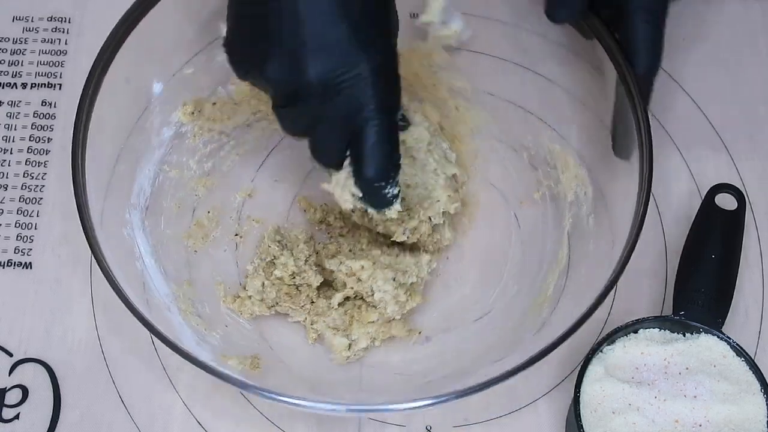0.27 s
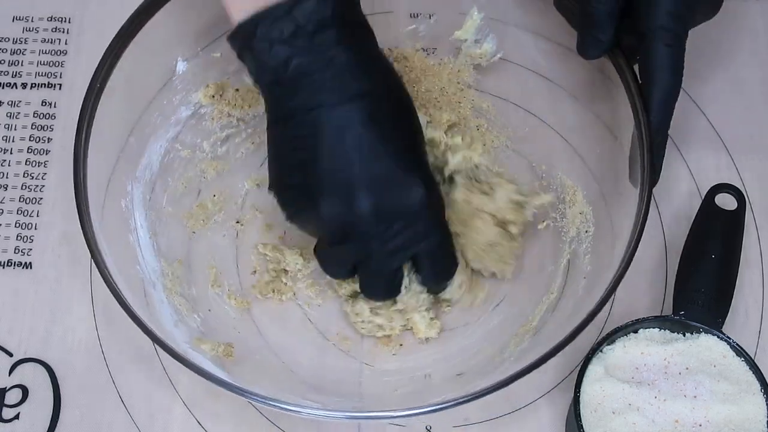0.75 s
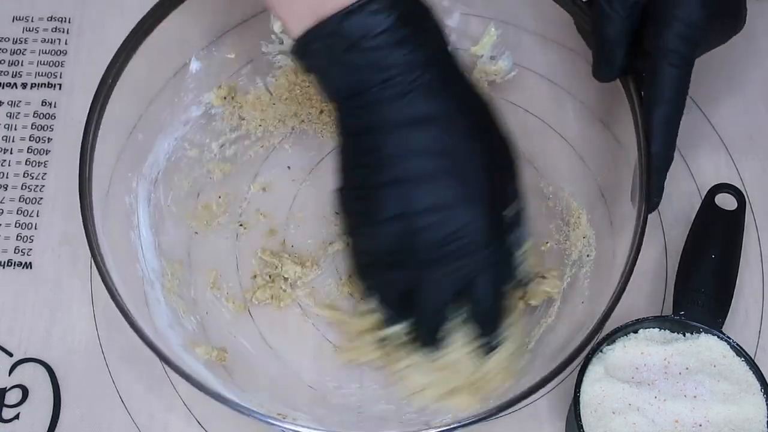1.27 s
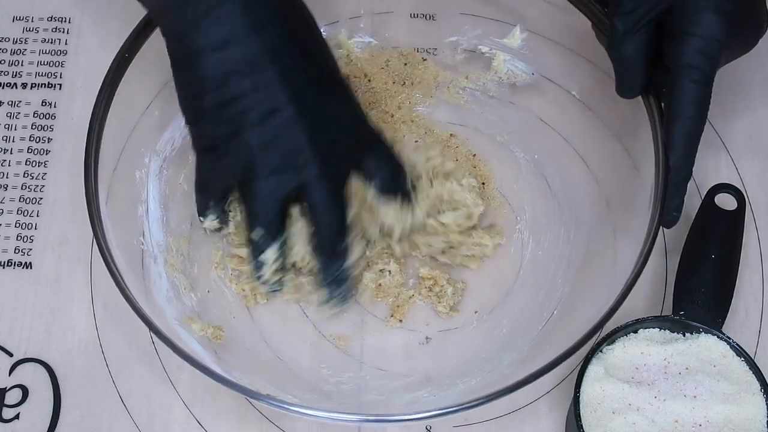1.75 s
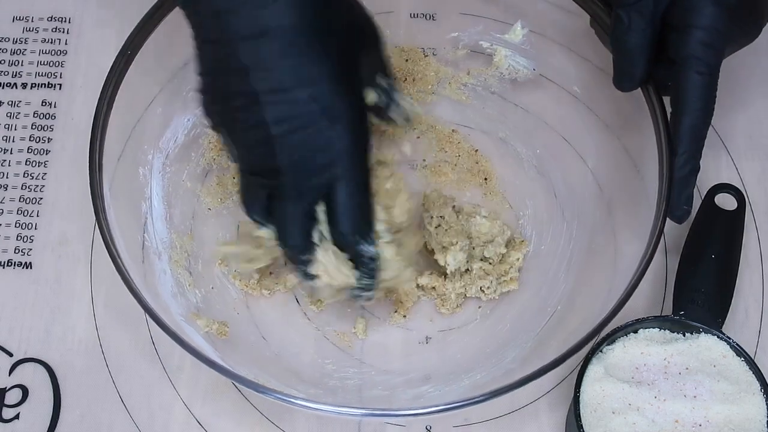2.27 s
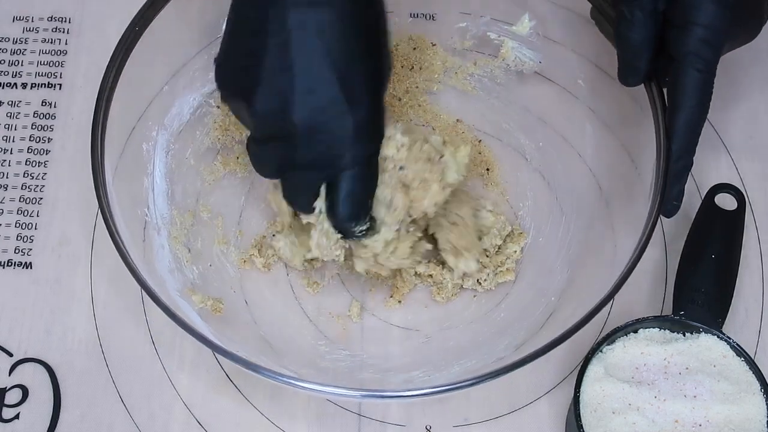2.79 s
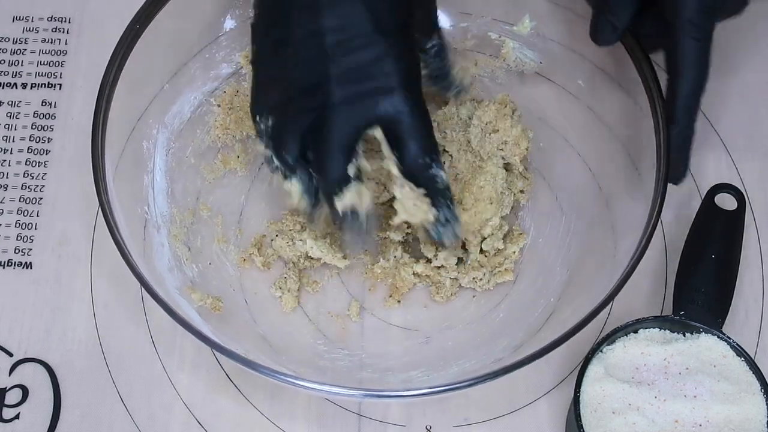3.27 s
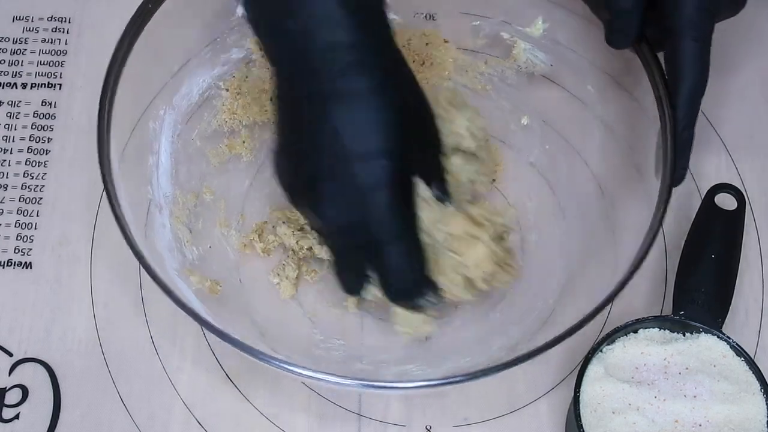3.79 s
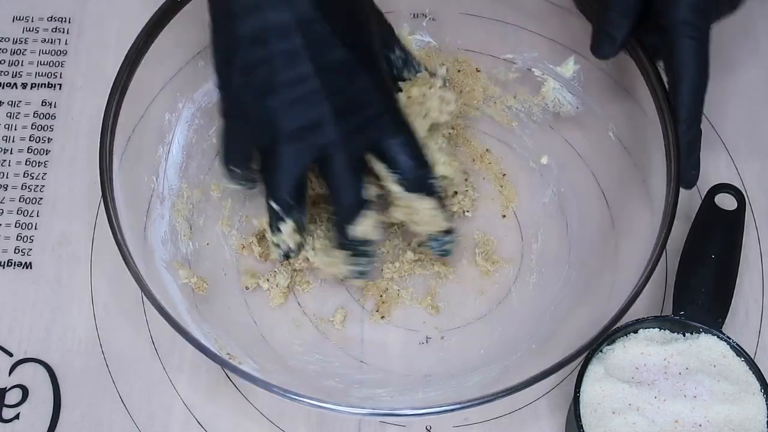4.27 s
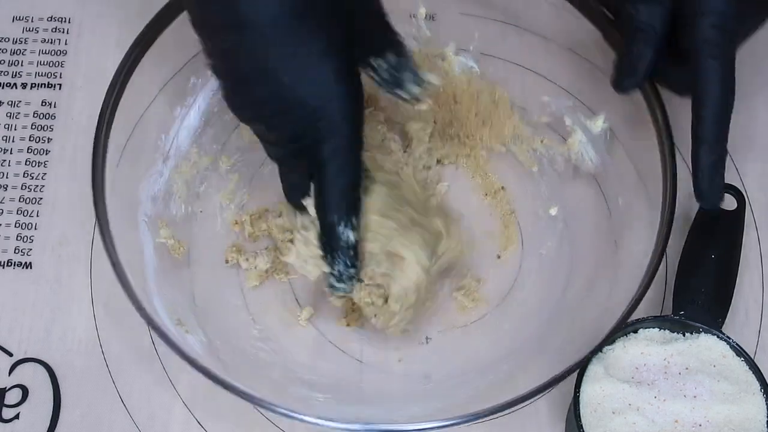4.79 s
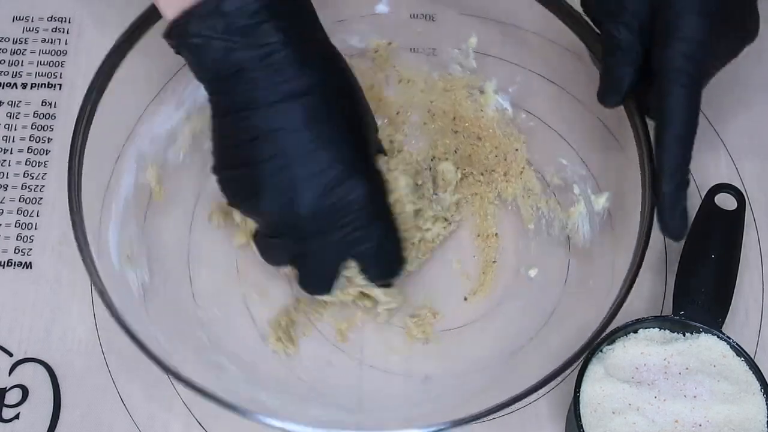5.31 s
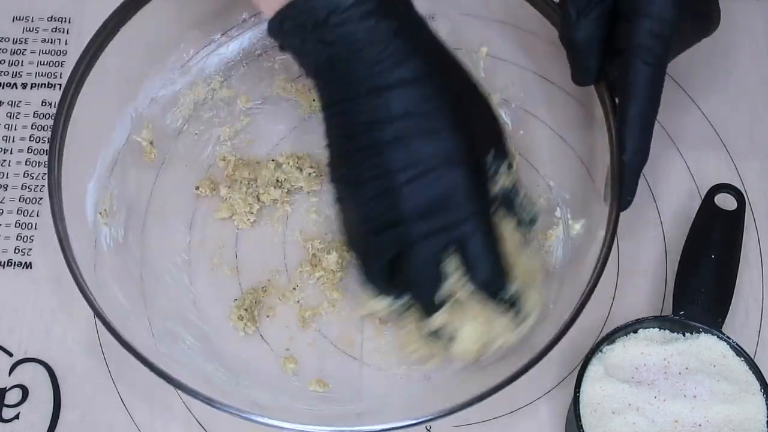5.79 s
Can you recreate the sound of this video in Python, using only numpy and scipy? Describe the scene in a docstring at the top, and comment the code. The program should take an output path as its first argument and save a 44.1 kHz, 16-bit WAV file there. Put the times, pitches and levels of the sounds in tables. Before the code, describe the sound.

Close stereo pickup of gloved hands kneading crumbly dough in a glass bowl. Soft gritty sliding, thin rubbery crinkles and tiny sticky snaps run throughout, with low dull worktop hums under the pushes. A solid bowl knock comes at one second, smaller ones in the middle, a cluster near 4.8 and the loudest blow at 5.5. Quiet kitchen hiss underneath.

```python
"""Dough slides and crumbles on a glass bowl (grainy noise through glass resonances) while gloves crinkle.
Every push of the kneading hands sets a light worktop humming low (decaying modes); sharp snaps click.
Now and then the tilted bowl drops back with a knock (bowl and board modes) that the kitchen answers.
A quiet hiss of room and camera lies under it all."""
import sys
import numpy as np
from scipy import signal
from scipy.fft import rfft, irfft, next_fast_len
from scipy.io import wavfile
from scipy.ndimage import map_coordinates

SR = 44100
rng = np.random.default_rng(int(sys.argv[2]) if len(sys.argv) > 2 else 0)


def store_pcm(level_fs):
    """Save levels as 16-bit WAV."""
    pcm = np.round(np.clip(level_fs, -1, 1) * 32767).astype(np.int16)
    wavfile.write(sys.argv[1], SR, np.atleast_2d(pcm).T)


N = 266805

# left-right likeness of lump and hiss: hz, correlation
LIKENESS = [(60, 1), (180, 0.41), (550, 0.25), (1650, 0.58), (4970, 0.15), (15000, 0.083)]


def amp(db):
    """Gain of a level in dB."""
    return np.exp(np.asarray(db) * (np.log(10) / 20))


def unit(x):
    """Scaled to rms 1."""
    return x / np.sqrt(np.mean(x ** 2) + 1e-20)


def along(points, hz):
    """Interpolates (Hz, value) points on a log-frequency axis."""
    point_hz, value = np.transpose(points)
    return np.interp(np.log(hz + 1), np.log(point_hz + 1), value)


def wobble(knots_per_s):
    """A smooth random curve through normally distributed knots."""
    knots = rng.standard_normal(int(N * knots_per_s / SR) + 4)
    return map_coordinates(knots, [np.arange(N) * knots_per_s / SR])


def filtered(x, response):
    """x times a complex response of frequency."""
    size = next_fast_len(x.shape[-1] + 8192)
    spectrum = rfft(x, size) * response(np.fft.rfftfreq(size, 1 / SR))
    return irfft(spectrum, size)[..., :x.shape[-1]]


def peak(f, hz, width_hz):
    """Response of one resonance."""
    return 1j * f * width_hz / (hz * hz - f * f + 1j * f * width_hz)


def grit(per_s, spread_db, share):
    """Two unrelated noise streams with sparse grains of uneven size mixed in by power share."""
    hits = rng.random((2, N)) < per_s / SR
    signs = np.sign(rng.standard_normal((2, N)))
    grains = hits * signs * amp(spread_db * rng.random((2, N)))
    share = np.clip(share, 0, 1)
    return np.sqrt(1 - share) * rng.standard_normal((2, N)) + np.sqrt(share) * unit(grains)


def spread(pair, colour, likeness):
    """Colours two streams and mixes them to left and right of the given likeness; rms 1."""
    def mid_side(hz):
        turn = np.arccos(np.clip(along(likeness, hz), -1, 1)) / 2
        return colour(hz) * [np.cos(turn), np.sin(turn)]

    mid, side = filtered(pair, mid_side)
    return unit(np.array([mid + side, mid - side]))


def add(track, s, sound):
    """Mixes a sound in at s seconds."""
    part = track[..., round(s * SR):][..., :sound.shape[-1]]
    part += sound[..., :part.shape[-1]]


def swells(rows, rise_db, fall_db_per_s, hold_s=0):
    """Gain of each movement every 64 samples: builds up to its peak, holds, then lets go."""
    peak_s, build_s, level_db = np.transpose(rows)[:3, :, None]
    after_s = np.arange(0, N, 64) / SR - peak_s
    rise = rise_db * after_s / np.maximum(build_s, .01)
    fall = -fall_db_per_s * np.maximum(after_s - hold_s, 0)
    return amp(level_db + np.where(after_s < 0, rise, fall))


def summed(gains):
    """Movements add up in power; one gain per sample."""
    total = np.sqrt(np.sum(gains ** 2, axis=0) + 1e-12)
    return np.interp(np.arange(N), np.arange(0, N, 64), total)


def dough():
    """Crumbs drag on the glass, duller when smeared and brighter when torn; the lump shifts its weight."""
    # strokes round the bowl: peak_s, build_up_s, sliding_db, hold_s, tearing (0-1)
    stroke_rows = [(0, .2, -48, 0.0055, .5), (0.175, 0.049, -52, 0.011, .55), (.42, 0.26, -60.5, 0, 0.7),
                   (.74, 0.33, -53, 0.077, .25), (0.977, 0.6, -55.5, 0.069, 0.28),
                   (1.34, .3, -52, 0.2, 0.54), (1.566, 0.18, -40, 0.15, 0.21), (1.9, 0.36, -55, 0.18, .35),
                   (2.155, 0.11, -51, 0, 0.25), (2.3, .08, -48.5, 0, 0.74), (2.347, 0.0084, -45, 0, .95),
                   (2.45, 0.15, -56, 0.23, 0.34), (2.72, 0.29, -55.5, 0.08, 0.56),
                   (2.871, 0.019, -49, 0.053, 0.78), (3.28, 0.067, -64, 0.024, 0.5),
                   (3.614, 0.25, -53.5, .04, 0.32), (3.795, 0.091, -48.5, 0, 0.26),
                   (3.92, 0.018, -48.5, 0.058, 0.45), (4.17, .12, -57, 0, 0.74),
                   (4.427, 0.44, -53.5, 0.096, .2), (4.62, 0.17, -48, 0.041, 0.16),
                   (5.162, 0.11, -58, 0.13, .37), (5.421, .15, -49.5, .02, 0.19),
                   (5.52, 0.12, -51.5, 0, 0.8), (5.887, 0.065, -55.5, 0.1, 0.37),
                   (6.05, 0.12, -49, 0, 0.31)]
    # dough-on-glass resonances: hz, width_hz, smeared_db, torn_db
    glass_peaks = [(1705, 430, 4, -1), (2267, 290, 4, 10.5), (2820, 680, -12.5, 14), (3490, 1380, -10, 3),
                   (4800, 1400, -14, -26)]
    # lump colour: hz, relative_db_per_hz
    lump_colour = [(71, -36), (120, -7), (285, -13.5), (349, -8), (392, -10.5), (1500, -21), (1950, -58),
                   (3300, -120)]
    lump_db, lump_db_per_sliding_db = -54, 0.36  # lump_db holds at sliding -55 dB

    def glass(column):
        def colour(f):
            # neighbouring resonances alternate in sign
            total = sum((-1) ** k * amp(row[column]) * peak(f, *row[:2]) for k, row in enumerate(glass_peaks))
            return total * f * f / (f * f + 1200 ** 2)
        return colour

    def drag(column):
        return spread(grit(per_s=980, spread_db=17, share=0.34), glass(column), [(1000, 1.0), (6000, 0.99)])

    hold_s, tearing = np.clip(np.transpose(stroke_rows)[3:, :, None], 0, 1)
    strokes = swells(stroke_rows, rise_db=18, fall_db_per_s=146, hold_s=hold_s)
    smeared, torn = drag(2), drag(3)
    slide = summed(strokes * np.sqrt(1 - tearing)) * smeared + summed(strokes * np.sqrt(tearing)) * torn
    lump = spread(grit(per_s=200, spread_db=28, share=0.41), lambda f: amp(along(lump_colour, f)), LIKENESS)
    lump_gain = (summed(strokes) / amp(-55)) ** lump_db_per_sliding_db
    return amp(1.06 * wobble(60)) * slide + amp(lump_db + 1.27 * wobble(9.3)) * lump_gain * lump


def gloves():
    """Flexing fingers crinkle the thin rubber: noise with tiny grains, its level wavering fast."""
    # finger flexes: peak_s, build_up_s, crinkle_db
    flex_rows = [(0, .2, -50), (.17, 0.062, -59.5), (.4, 0.41, -60), (.71, 0.27, -58.5), (.78, .06, -57.5),
                 (1.0, 0.31, -57.5), (1.2, .04, -59), (1.55, 0.66, -60), (1.69, .3, -59), (1.99, 0.57, -65),
                 (2.15, 0.8, -58), (2.26, 0.027, -52.5), (2.4, 0.33, -56), (2.78, 0.48, -57),
                 (2.92, 0.24, -51.5), (3.2, 0.55, -61), (3.5, 0.07, -70), (3.64, 0.12, -55.5),
                 (3.74, .05, -59), (3.93, 0.17, -62), (4.15, 1, -56), (4.44, 0.042, -57),
                 (4.65, 0.36, -54.5), (4.76, .15, -51.5), (4.84, 0.14, -53), (4.92, .05, -59),
                 (5.29, 0.3, -57.5), (5.38, 0.12, -56), (5.44, 0.051, -51.5), (5.52, 0.25, -52.5),
                 (5.61, .02, -63), (6.05, 0.14, -56.5)]
    # crinkle colour: hz, relative_db_per_hz
    crinkle_colour = [(2940, -20), (5000, -8.5), (7790, -18), (8710, -16), (10500, -17), (12900, -13.5),
                      (14600, -18.5), (16000, -49)]
    grains = grit(per_s=700, spread_db=1, share=0.44)
    crinkle = spread(grains, lambda f: amp(along(crinkle_colour, f)), [(4000, 0.19), (15000, 0.053)])
    flexes = summed(swells(flex_rows, rise_db=17, fall_db_per_s=181))
    return flexes * amp(2.3 * wobble(40)) * crinkle


def room_hiss():
    """Steady noise of room and camera, strongest in the bass."""
    # hiss colour: hz, relative_db_per_hz
    hiss_colour = [(15, -32), (25, 6), (76, 3.5), (200, -7), (256, -3.5), (575, -16), (887, -11.5),
                   (1370, -18), (2220, -16), (7510, -32), (13200, -45), (14800, -52), (16000, -60)]
    level_db = -50
    noise = rng.standard_normal((2, N))
    return amp(level_db) * spread(noise, lambda f: amp(along(hiss_colour, f)), LIKENESS)


def worktop():
    """A hand's slow push rings the modes of the worktop on its legs, most those near its favoured pitch."""
    # hand leaning on the worktop: push_s, level_db, favoured_hz
    pushes = [(0.018, -36, 120), (0.253, -32, 103.5), (0.431, -32, 114.2), (0.871, -35.5, 182.4),
              (1.089, -38, 69), (1.203, -37.5, 150), (1.602, -38, 73.4), (2.029, -44, 53),
              (2.269, -37.5, 67.9), (2.399, -29.5, 105), (2.523, -36.5, 119.4), (2.696, -32.5, 66),
              (2.817, -29.5, 101.3), (3.073, -28.5, 92), (3.255, -36, 50.2), (3.516, -36, 69),
              (3.661, -36.5, 70.7), (3.776, -36.5, 76), (4.053, -27.5, 66.7), (4.296, -35.5, 71.3),
              (4.383, -32, 78.6), (4.929, -29, 150), (5.102, -39, 69), (5.263, -31, 90), (5.579, -41, 69),
              (5.702, -31, 92)]
    # worktop modes: hz, relative_db, t60_s
    worktop_modes = [(46, 11.5, 0.58), (53, 7, 0.34), (69, 7, 0.9), (76, 0.5, 0.86), (87.8, -2, 1),
                     (101.6, -6, 0.39), (105, -12, 0.47), (123.6, 3.5, 0.39), (150, 6.5, 0.46),
                     (177.3, -3.5, 0.6)]
    out, t = np.zeros((2, N)), np.arange(SR // 2) / SR
    hz, mode_db, t60_s = np.transpose(worktop_modes)[..., None]
    phase = rng.random((len(pushes), len(worktop_modes), 1)) * 2 * np.pi
    lead_rad = np.array([[.12], [-.12]])  # left leads a little
    onset = 1 - np.exp(-t / 0.021)
    modes = amp(mode_db - 60 * t / t60_s) * onset * np.exp(2j * np.pi * hz * t)
    for (s, db, push_hz), start in zip(pushes, phase):
        near_db = -np.minimum(110 * np.abs(np.log2(hz / push_hz)), 22)
        hum = (amp(db + near_db) * np.exp(1j * start))[:, 0] @ modes
        add(out, s - .01, np.imag(hum * np.exp(1j * lead_rad)))
    return out * amp([[.45], [-.45]])


def snaps():
    """Glove and dough snaps: a sharp click and a short spray after it, through three bands."""
    # snaps: start_s, low_band_db, high_band_db, left_over_right_db
    snap_rows = [(0.171, -37.5, -59, -1), (0.395, -47, -53.5, -.5), (0.7033, -63, -59, -7),
                 (0.9847, -48, -72, -.5), (1.185, -42, -59, 4), (1.824, -51, -58, 1),
                 (1.9908, -47, -52, -2), (2.143, -43, -61.5, -2), (2.2465, -46, -52.5, 0),
                 (2.3108, -33, -56, 0), (2.4094, -48, -54, -2), (2.6949, -34, -81, -2),
                 (2.8844, -37, -55, 3), (2.9079, -45, -56, 2), (2.9385, -45.5, -57, -3),
                 (3.5083, -58, -55.5, 0), (3.6192, -55, -62, .5), (3.7218, -47, -52, -4),
                 (4.0228, -38.5, -62, -2), (4.1445, -40.5, -50, 2), (4.422, -63, -57, -1),
                 (4.588, -41.5, -58, 2), (4.6494, -57, -57, 2), (4.9076, -40.5, -55, -7),
                 (5.226, -51, -49, 2), (5.2824, -60, -50, -3), (5.3632, -38, -62, -2),
                 (5.431, -37, -51, -.5), (5.6065, -41, -55, -1), (6.0331, -43, -58, -1)]
    # low, middle, high band: hz, width_hz, extra_gain_db
    bands = [(2460, 2030, 9.5), (6100, 440, -1.5), (12200, 5000, 10)]
    middle_db = 8.5  # over the mean of low and high
    out, t = np.zeros((2, N)), np.arange(SR // 20) / SR
    noise = rng.standard_normal((len(snap_rows), 2, len(t)))
    spray_gain = amp(-21.0 - 60 * t / 0.013) + amp(-8.0 - 60 * t / 0.045)
    for (s, low_db, high_db, pan_db), spray in zip(snap_rows, noise):
        levels_db = [low_db, (low_db + high_db) / 2 + middle_db, high_db]
        pair = (t == 0) * 7.5 + spray * spray_gain

        def colour(f):
            return sum(amp(db + extra_db) * peak(f, hz, width_hz) ** 2
                       for db, (hz, width_hz, extra_db) in zip(levels_db, bands))

        add(out, s, amp([[pan_db / 2], [-pan_db / 2]]) * filtered(pair, colour))
    return out


def kitchen(x, wet_db):
    """The sound with a fresh noise tail 6 ms late; each frequency dies at its own speed."""
    # kitchen decay: hz, t60_s
    decay = [(100, 0.46), (400, 0.43), (1500, 0.4), (3000, 0.4), (6000, 0.16), (12000, 0.19)]
    # kitchen colour: hz, relative_db
    tail_colour = [(60, 0.5), (200, 1), (800, 2), (2000, -6), (4000, 6.5), (9000, -11.5)]
    hz, t, z = signal.stft(rng.standard_normal((2, len(x))), SR, nperseg=256)
    tail_db = along(tail_colour, hz)[:, None] - 60 * t / along(decay, hz)[:, None]
    tail = signal.istft(z * amp(tail_db), SR, nperseg=256)[1]
    # close microphone ports hear nearly the same room
    tail = tail[0] + amp(-17.5) * np.array([tail[1], -tail[1]])
    late = np.pad(x, (round(.006 * SR), 0))[None]
    wet = signal.fftconvolve(late, tail / np.linalg.norm(tail[0]), axes=1)[:, :len(x)]
    return x + amp(wet_db) * wet


def knocks():
    """Each bowl landing rings the modes in six groups, by where and how hard the base strikes."""
    # landings on the worktop: start_s, edge_db, low_weight_db (re edge), thud_db (re weight),
    # bright_crack_db (re edge), ring_length (multiple of usual), rim_note_db
    landings = [(1.0285, -39.5, -8.5, 7, -26, .54, -75), (1.0726, -10.5, -3.5, 5.5, -27, .84, -49),
                (2.3523, -33, -13, 13, -24, .75, -90), (2.4608, -51.5, 1.5, 9, -18, 1, -56.5),
                (2.826, -53.5, 5, 15.5, -15, .72, -64), (3.2603, -42.5, -18, -7, -19, .74, -83),
                (3.4081, -40.5, -27, 9, -20, .57, -85), (3.4742, -29.5, -2, 2, -36, .75, -65),
                (3.934, -24.5, -0.5, 6.5, -29, .77, -60), (3.9754, -33, 2.5, 0, -18, .67, -61),
                (4.6387, -39, -12.5, -12, -22, 1, -60), (4.7539, -12, -6.5, -6, -47, .96, -45),
                (4.7949, -17.5, -1.5, 7, -36, 1, -50.5), (4.847, -10.5, -9.5, -4, -30, .87, -41.5),
                (4.864, -24, 4, 4.5, -29, .67, -45), (4.9052, -33.5, 6, -4, -24, .65, -62),
                (5.4307, -34, -25, -3, -22, .6, -72), (5.5282, 1, -14, -22, -27, .35, -51),
                (5.5404, -8.5, -10, -5, -38, .35, -54), (5.646, -17.5, -6.5, 4, -46, .55, -44)]
    # bowl and board ringing together: hz, relative_db, usual_t60_s
    bowl_modes = [(150, -20.5, 0.25), (179.6, 4.5, 0.34), (258.8, 12, 0.15), (290.5, 6, 0.17),
                  (353.8, 9, 0.12), (409, 5, 0.12), (439, -3, 0.093), (555, 1, 0.12), (576, -36, 0.17),
                  (608, -2, 0.19), (659, -5.5, 0.15), (687.4, 6, 0.13), (722.5, 3, 0.11), (860, -24, .15),
                  (1077, 3.5, 0.046), (1130, -8, 0.12), (1483, 2, 0.028), (1452, 9.5, 0.023),
                  (1640, -19, 0.015), (1880, 7.5, 0.029), (2096, -7.5, 0.02), (2143, -5, 0.1),
                  (2505, -1.5, 0.028), (2670, -1, 0.031), (3002, -10, 0.031)]
    # the board's dense shudder: hz, width_hz, relative_db, usual_t60_s
    board_bands = [(169, 82, 11, 0.41), (378, 350, 5, 0.33), (720, 400, 9.5, 0.063),
                   (1200, 720, 7.5, 0.049), (2400, 430, -10.5, 0.2), (3200, 350, -2, 0.04),
                   (4900, 1100, -37, 0.05)]
    # bounds between thud, lowest note, weight, clack, wood and edge: hz
    group_bounds_hz = [215, 275, 520, 900, 1600]
    # the rim's lowest note when the hand lets it sing: hz, t60_s
    rim_hz, rim_t60_s = (253, 5.5)
    note_db = 0.5  # re weight
    clack_db, clack_follows_weight, wood_db = -4.5, .45, -5  # both levels re edge
    detune = 0.023  # random share by which the grip shifts each upper mode from blow to blow

    out, t = np.zeros((2, N)), np.arange(SR * 3 // 4) / SR
    hz, mode_db, t60_s = np.transpose(bowl_modes)[..., None]
    band_hz, width_hz, band_db, band_t60_s = np.transpose(board_bands)[..., None]
    chance = rng.standard_normal((len(landings), len(bowl_modes), 3))
    for (s, db, weight_db, thud_db, hard_db, free, sing_db), luck in zip(landings, chance):
        groups_db = np.array([weight_db + thud_db, weight_db + note_db, weight_db,
                              clack_db + clack_follows_weight * weight_db, wood_db, 0])

        def group_db(f):
            return db + groups_db[np.searchsorted(group_bounds_hz, f)]

        def fade_db(decay_s):  # hand and dough damp the ring
            return -60 * t / (decay_s * np.clip(free, .2, 3))

        held_hz = hz * (1 + detune * (hz > group_bounds_hz[3]) * luck[:, 2:])
        ring_db = group_db(hz) - 7.5 + mode_db + 2.23 * luck[:, :1] + fade_db(t60_s)
        phase = 2 * np.pi * held_hz * t + 1.03 * luck[:, 1:2]
        ring = np.sum(amp(ring_db) * np.sin(phase), axis=0)
        ring *= 1 - np.exp(-t / 0.00064)
        # the base chatters on the mat and re-excites the modes at random
        chatter = amp(-31 - 60 * t / 0.1) * rng.standard_normal(len(t))
        ring = ring + signal.fftconvolve(ring, chatter)[:len(t)]
        # the board's lesser modes lie too close to tell apart: noise dying band by band
        shudder_db = group_db(band_hz) + band_db + fade_db(band_t60_s)
        shudder = amp(shudder_db) * rng.standard_normal((len(board_bands), len(t)))
        ring = ring + filtered(shudder, lambda f: peak(f, band_hz, width_hz) ** 2).sum(axis=0)

        def crack_colour(f):
            dull = amp(1.5) * peak(f, 1760, 1080) ** 2
            bright = amp(hard_db + 25.5) * peak(f, 4260, 6000) / (1 + 1j * f / 8000) ** 6
            return dull + bright

        burst = amp(db - 60 * t / 0.0025) * rng.standard_normal(len(t))
        crack = filtered(burst, crack_colour)
        rim = amp(sing_db - 60 * t / rim_t60_s) * np.sin(2 * np.pi * rim_hz * t)
        rim *= (1 - t / t[-1]) ** 0.042  # ends without a step
        add(out, s, kitchen(ring + crack, wet_db=-9.5) + rim)
    return out


def scene():
    """Kneading, pushes, snaps and knocks over the quiet hiss."""
    return dough() + gloves() + room_hiss() + worktop() + snaps() + knocks()


def record(dry):
    """The loudest blow clips softly; the microphone drops the deepest bass and nothing above top_hz is kept."""
    clip_top, top_hz, bass_cut_hz = .92, 15900, 36
    clipped = dry / (1 + np.abs(dry / clip_top) ** 8) ** (1 / 8)
    return filtered(clipped, lambda hz: (hz < top_hz) * (1j * hz / (1j * hz + bass_cut_hz)) ** 3)


dry = scene()
out = record(dry)
store_pcm(out)
```